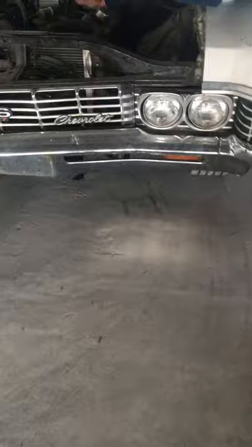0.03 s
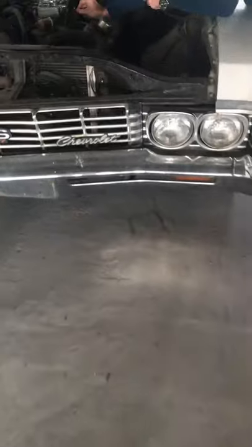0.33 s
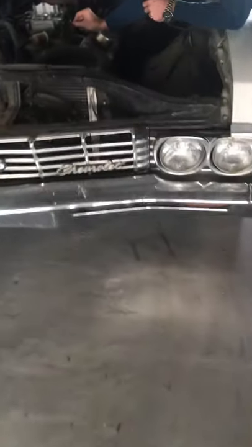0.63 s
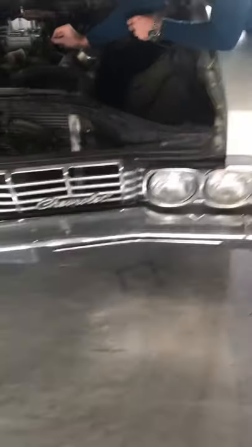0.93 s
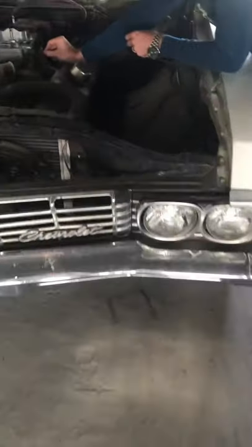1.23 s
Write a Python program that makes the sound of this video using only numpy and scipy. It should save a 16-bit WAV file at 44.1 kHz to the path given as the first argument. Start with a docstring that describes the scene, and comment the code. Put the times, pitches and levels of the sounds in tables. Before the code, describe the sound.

An old car engine idling in a garage, rumbling unevenly with faint belt squeaks.

```python
"""An old V8 idles in a garage, hood open, its eight uneven firings making a loping rumble.
The microphone starts in front of the bumper and moves in over the engine bay, where the balance of the
exhaust tones shifts. Around the rumble the fan rushes, belt-driven parts whine, the rubbing belt
chirrs and squeaks, and loose valves tick lightly."""
import sys
import numpy as np
from scipy import signal
from scipy.fft import rfft, irfft
from scipy.io import wavfile

SR = 44100
rng = np.random.default_rng(int(sys.argv[2]) if len(sys.argv) > 2 else 0)


def generate_wav(signal):
    """Clip the signal to [-1, 1] and save it as 16-bit WAV at the path in sys.argv[1]."""
    frames = np.transpose(np.atleast_2d(signal))
    scaled = np.clip(frames, -1, 1) * 32767
    pcm = np.round(scaled).astype(np.int16)
    wavfile.write(sys.argv[1], SR, pcm)


N = 176400
T = np.arange(N) / SR
HZ = np.fft.rfftfreq(N, 1 / SR)


def amp(db):
    """Decibels to gain."""
    return 10 ** (np.asarray(db) / 20)


def unit(x):
    """Scales to rms 1."""
    return x / np.sqrt(np.mean(x ** 2) + 1e-20)


def curve(table, column=1):
    """One column of a table, interpolated over time."""
    table = np.asarray(table)
    return np.interp(T, table[:, 0], table[:, column])


def colour(x, points):
    """Filters by a spectrum of (Hz, dB) points."""
    hz, db = np.transpose(points)
    return irfft(rfft(x) * amp(np.interp(np.log(HZ + 1), np.log(hz), db)), N)


def band(x, low_hz, high_hz):
    """Keeps one frequency band."""
    return irfft(rfft(x) * ((HZ >= low_hz) & (HZ < high_hz)), N)


def drift(rate_hz):
    """Random wandering of rms 1, mostly slower than rate_hz."""
    return unit(irfft(rfft(rng.standard_normal(N)) * (HZ > 0) / (1 + (HZ / rate_hz) ** 4), N))


def tone(turns, rough, rough_hz):
    """A sine of rms near 1 that wavers in level and phase."""
    waver = 1 + rough * (drift(rough_hz) + 1j * drift(rough_hz)) / np.sqrt(2)
    return np.sqrt(2 / (1 + rough ** 2)) * (waver * np.exp(2j * np.pi * turns)).real


def rubbed(hz, width_hz):
    """A resonance excited by friction, rms 1."""
    detuning = (HZ - hz) / width_hz
    return unit(irfft(rfft(rng.standard_normal(N)) / (1 + 1j * detuning) ** 2, N))


# Thin metallic rings, far back in the sound. Each row: pitch in Hz, width in Hz, relative level in dB.
RING_MODES = [(5454, 150, -0.5), (4430, 60, -5)]
# They swell a little once the microphone has settled. Each row: time in seconds, level in dB.
RING_LEVEL = [(0, -47), (1.5, -52), (2.35, -53), (2.6, -50), (2.95, -45.5), (3.3, -50.5), (3.7, -48),
              (4, -49)]


def running_gear():
    """Friction keeps the metal of the running gear ringing faintly."""
    return amp(curve(RING_LEVEL)) * sum(amp(db) * rubbed(hz, width) for hz, width, db in RING_MODES)


# Loose valves under the open hood. Each row: place in the cycle from 0 to 1, relative level in dB,
# decay time in units of 1.5 ms.
LOOSE_VALVES = [(.905, 0, 3.2), (.865, -8, 3.3), (0.1, -3.5, 4), (0.3, -8, 4), (.27, -14, 4)]
# Now and then one clacks harder. Each row: start in seconds, level in dB above a usual tick.
CLACKS = [(1.739, 6), (3.097, 2), (3.486, 10)]
# The ring of a tick. Each row: frequency in Hz, gain in dB.
TICK_SPECTRUM = [(1000, 4), (3500, -18), (6000, -23), (7700, -6), (8500, 8), (9400, -4), (10400, -11),
                 (11500, -7), (13500, -14), (16000, -6)]
# The ticking at the microphone. Each row: time in seconds, level in dB.
TICK_LEVEL = [(0, -50), (.8, -42.5), (1.6, -48), (2.1, -50), (2.7, -51), (3.2, -47), (4, -51)]


def valves(cycles):
    """Each loose valve ticks once a cycle: a short burst of bright noise, never twice alike."""
    jitter_s, spread_db, clack_decay_s = 0.0006, 2.5, 0.0026
    envelope = np.zeros(N)
    t = np.arange(0, 0.04, 1 / SR)
    for place, db, decay in LOOSE_VALVES:
        starts = np.interp(np.arange(int(cycles[-1]) + 1) + place, cycles, T)
        for start, (late, loud) in zip(starts, rng.standard_normal((64, 2))):
            tick = amp(db + spread_db * loud) * np.exp(-t / (decay * 0.0015))
            onset = max(round((start + jitter_s * late) * SR), 0)
            span = envelope[onset:onset + len(t)]
            span += tick[:len(span)]
    for start, db in CLACKS:
        envelope[round(start * SR):][:len(t)] += amp(db) * np.exp(-t / clack_decay_s)
    ticks = colour(envelope * rng.standard_normal(N), TICK_SPECTRUM)
    return amp(curve(TICK_LEVEL)) * unit(ticks)


# The pump's whine, strongest from the bumper. Each row: time in seconds, level in dB.
PUMP_LEVEL = [(0, -40), (.125, -26), (.175, -36), (.23, -28), (.36, -37), (.68, -41), (.8, -32), (.89, -44),
              (.925, -25.5), (1.04, -39), (1.1, -31.5), (1.2, -40.5), (1.4, -32.5), (1.5, -45.5),
              (2.8, -50), (3.15, -42), (3.595, -43), (3.63, -31), (3.8, -33), (4, -33.5)]
# The alternator's thinner whine, clearer over the engine bay. Each row: time in seconds, level in dB.
ALTERNATOR_LEVEL = [(0, -54), (1.75, -46), (1.95, -42), (2.4, -42), (2.55, -48), (2.7, -40.5),
                    (3.05, -42.5), (3.3, -44.5), (4, -45)]
# Faint pulley tones behind them. Each row: multiple of the cycle rate, level in dB.
PULLEY_TONES = [(47.13, -49), (107.2, -49.5), (94.8, -48)]


def accessories(cycles):
    """Pump, alternator and pulleys are geared to the crank by the belt, so their whines follow it."""
    pump_order, alternator_order = 117.8, 142.5  # multiples of the cycle rate
    pump = tone(pump_order * cycles, rough=0.33, rough_hz=25)
    pump += amp(-5.5) * tone(2 * pump_order * cycles, rough=0.68, rough_hz=30)
    alternator = tone(alternator_order * cycles, rough=0.36, rough_hz=19)
    pulleys = sum(amp(db) * tone(order * cycles, rough=0.9, rough_hz=13) for order, db in PULLEY_TONES)
    return amp(curve(PUMP_LEVEL)) * pump + amp(curve(ALTERNATOR_LEVEL)) * alternator + pulleys


# A pulley ringing under the belt. Each row: pitch in Hz, width in Hz, relative level in dB.
PULLEY_MODES = [(2513, 40, 3), (2437, 81, -4), (2660, 116, 0)]
# Its chirr at the microphone. Each row: time in seconds, level in dB.
CHIRR_LEVEL = [(0, -22.5), (0.15, -30.5), (0.45, -31.5), (0.62, -27), (0.8, -39), (0.92, -25),
               (1.05, -27.5), (1.25, -36.5), (1.42, -30.5), (1.65, -35.5), (1.88, -42.5), (2.15, -34),
               (2.38, -42), (2.52, -36), (2.8, -32.5), (3.05, -33.5), (3.3, -31.5), (3.5, -28.5),
               (3.8, -32), (4, -34.5)]


def belt_chirr():
    """The belt rubs unevenly and rings a pulley."""
    ringing = sum(amp(db) * rubbed(hz, width) for hz, width, db in PULLEY_MODES)
    flutter = amp(1.5 * drift(rate_hz=35))
    return amp(curve(CHIRR_LEVEL)) * unit(ringing * flutter)


# Squeaks heard close, over the engine bay. Each row: time of the peak in seconds, pitch in Hz,
# level in dB, half length in seconds.
SQUEAKS = [(1.566, 2540, -28, .025), (1.96, 3190, -36, .02), (2.069, 3195, -36, .02),
           (2.278, 3130, -38, .025), (2.978, 2545, -28, .012), (3.055, 2590, -29, 0.014),
           (3.474, 2489, -30, 0.017), (3.938, 2518, -26, 0.02)]


def belt_squeaks():
    """The rubbing belt squeaks: a narrow resonance swells and fades in a moment."""
    return sum(amp(db) * np.exp(-((T - peak_s) / half_s) ** 2) * rubbed(hz, width_hz=51)
               for peak_s, hz, db, half_s in SQUEAKS)


# Fan air from the open engine bay. Each row: frequency in Hz, relative level in dB.
AIR_SPECTRUM = [(20, -17), (35, -10), (60, 17.5), (170, 2.5), (300, 2), (390, -5), (500, -2), (650, 2),
                (900, -1.5), (1150, 2), (1600, -3.5), (2200, -1), (2900, -4.5), (3300, -5.5), (4400, -8.5),
                (4900, -14.5), (5500, -11.5), (6800, -13.5), (7700, -17), (8700, -14.5), (10400, -20),
                (11300, -17.5), (13000, -19.5), (16000, -21)]
# The rush eases as the microphone moves in. Each row: time in seconds, then relative levels in dB
# of the body, the low mids, the mids and the treble.
AIR_LEVELS = [(0, -27, -31.5, -33.5, -35.5), (0.35, -31.0, -33.0, -34.0, -36.5),
              (0.75, -29, -31.5, -33.5, -35.5), (1.1, -32, -34.5, -34.5, -37.5),
              (1.5, -34, -33.5, -37.5, -38.5), (1.9, -36, -36.5, -38.5, -41.0),
              (2.35, -37.0, -38, -41, -43.0), (2.8, -36.0, -36.5, -38.5, -42.5),
              (3.2, -34.5, -36, -39.0, -41.5), (3.55, -36.5, -34.5, -38.5, -41.0),
              (4, -37.0, -39, -42.5, -43.0)]


def fan(cycles):
    """The fan's rushing air flutters and pulses a little with the firings."""
    air = colour(rng.standard_normal(N), AIR_SPECTRUM)
    # Each row: band in Hz, the part of it scaled to rms 1 in Hz, trim in dB.
    registers = [((0, 1400), (400, 1100), -1), ((1400, 2700), (1550, 2300), -0.37),
                 ((2700, 5200), (3000, 5000), -0.47), ((5200, SR), (6000, 15000), -1)]
    rush = np.zeros(N)
    for column, (edges, core, trim_db) in enumerate(registers, start=1):
        register = band(air, *edges) / band(air, *core).std()
        rush += register * amp(trim_db + curve(AIR_LEVELS, column))
    pulsing = 1 + 0.045 * np.cos(2 * np.pi * len(CYLINDERS) * cycles)
    flutter = amp(0.85 * drift(rate_hz=58.6))
    return rush * pulsing * flutter


# Unequal cylinders set the phases of the deep tones. Each entry, in firing order: strength in dB.
CYLINDERS = [-0.5, 0.5, 3, 1, -2, 0, 2.5, 2]
# The firing note, in front of everything else. Each row: time in seconds, level in dB.
FIRING_LEVEL = [(0.1, -13), (0.28, -11.5), (0.4, -13.5), (1.09, -11), (1.13, -12), (1.55, -11),
                (2.64, -11.5), (2.87, -14.5), (3.12, -12.5), (3.56, -12.5), (3.77, -10.5), (3.95, -11)]
# A hum that comes and goes. Each row: time in seconds, relative level in dB.
HUM_LEVEL = [(0.1, -21), (0.18, -27), (0.36, -32), (1.25, -23.5), (1.47, -61), (1.94, -27.5), (2.59, -24),
             (3.1, -42), (3.79, -23), (3.95, -36)]
# The other exhaust tones from both microphone positions. Each row: order (multiple of the cycle rate),
# level in dB in front of the bumper, level in dB over the engine bay.
EXHAUST_ORDERS = [(3, -61, -64), (4, -62, -67), (5, -29, -36), (6, -27, -42), (7, -48, -48), (9, -41, -51),
                  (10, -35, -33), (11, -36, -38.5), (12, -53, -64), (14, -55, -55), (15, -29.5, -34.5),
                  (16, -32.5, -37), (17, -36, -45), (18, -32, -45), (19, -39, -39.5), (20, -31.5, -48),
                  (21, -52, -58), (22, -46, -40.5), (24, -38.5, -45.5), (26, -75, -59), (27, -44, -52),
                  (28, -44.5, -45.5), (29, -43.5, -46.5), (30, -40.5, -43.5), (32, -52, -47.5),
                  (34, -46, -56)]
# Each register chugs at its own moment. Each row: order, delay as a share of the cycle.
CHUG_DELAYS = [(15, .3), (17, .3), (18, 0.21), (19, -.1), (20, 0.02), (22, 0.03), (25, 0.39), (28, 0.03),
               (34, 0.01)]


def exhaust(cycles):
    """Uneven firings make the firing note and deep tones; the exhaust chugs above them once a cycle."""
    move_from_s, move_to_s, chug_lag_s = 0.96, 1.47, 0.59  # the chug takes up the move later
    smear_far_rad, smear_near_rad = 0.4, 0.72  # the room smears the chug, more over the engine bay
    count = len(CYLINDERS)
    cylinder_phase = np.angle(np.fft.fft(amp(CYLINDERS))) / (2 * np.pi)
    chug_phase = np.cumsum(np.interp(np.arange(count * count), *np.transpose(CHUG_DELAYS)))
    turns = cycles - 0.0894  # cycles since the first firing
    rumble = amp(curve(FIRING_LEVEL)) * tone(count * turns, rough=0.029, rough_hz=5.9)
    hum = tone(13 * turns + cylinder_phase[13 % count], rough=0.23, rough_hz=3)
    rumble += amp(curve(HUM_LEVEL) - 1) * hum
    for order, far_db, near_db in EXHAUST_ORDERS:
        k = round(order)
        chugs = k >= 15
        near = np.clip((T - move_from_s - chugs * chug_lag_s) / (move_to_s - move_from_s), 0, 1)
        smear_rad = (smear_far_rad + near * (smear_near_rad - smear_far_rad)) * rng.standard_normal()
        if chugs:
            phase = k * cycles - chug_phase[k] + smear_rad / (2 * np.pi)
        else:
            phase = k * turns + cylinder_phase[k % count]
        rumble += amp(far_db + near * (near_db - far_db)) * tone(phase, rough=0.23, rough_hz=5.6)
    return rumble


# The idle wanders slightly. Each row: time in seconds, firings per second.
FIRING_RATE = [(0, 82.5), (0.25, 82), (0.7, 84.4), (1.1, 81.4), (1.5, 80.2), (1.75, 82), (2.1, 81.91),
               (2.6, 81.95), (2.85, 83.69), (3.2, 83), (3.55, 83.15), (3.8, 80.6), (4, 82.4)]


def scene():
    """The whole engine at one microphone, timed by its cycle of two crank turns."""
    cycles = np.cumsum(curve(FIRING_RATE)) / SR / len(CYLINDERS)
    engine = exhaust(cycles) + fan(cycles) + accessories(cycles)
    engine += belt_chirr() + running_gear() + belt_squeaks() + valves(cycles)
    return engine[None]


def record(dry):
    """The microphone's channel opens after 35 ms and cuts the highest treble."""
    opened = np.clip((T - 0.035) / 0.003, 0, 1)
    lowpass = signal.firwin(511, cutoff=15750, window=("kaiser", 9), fs=SR)
    return signal.oaconvolve(dry * opened, lowpass[None], "same")


dry = scene()
out = record(dry)
generate_wav(out)
```